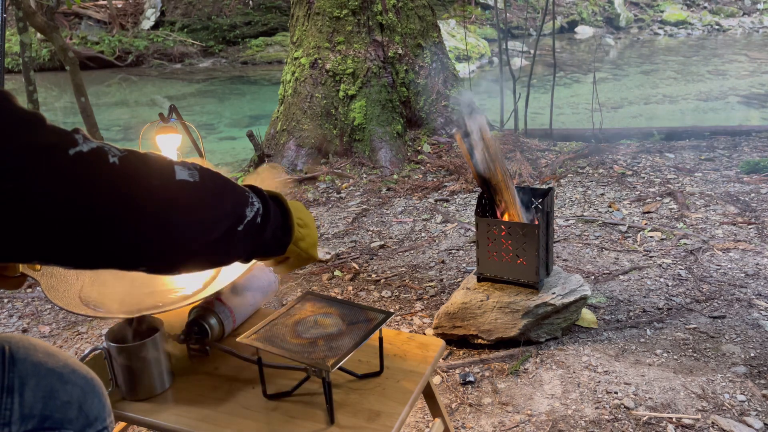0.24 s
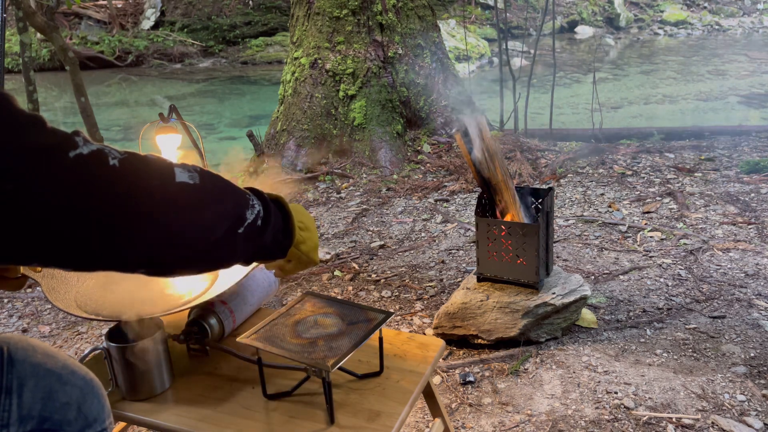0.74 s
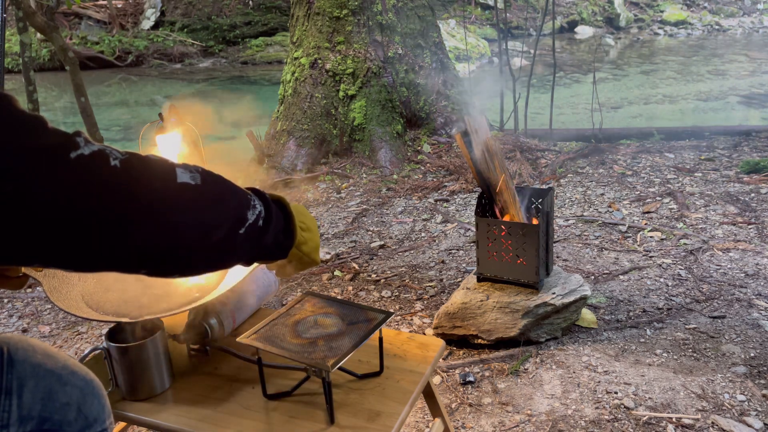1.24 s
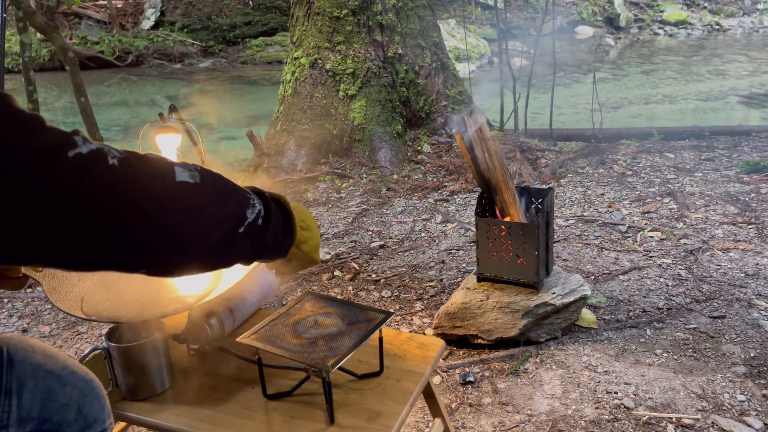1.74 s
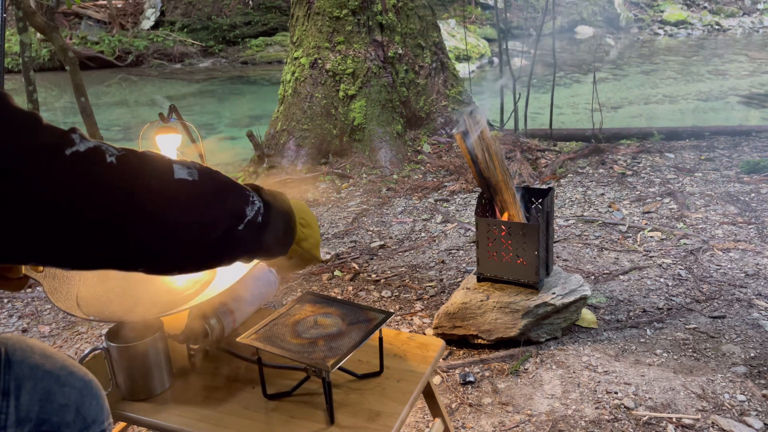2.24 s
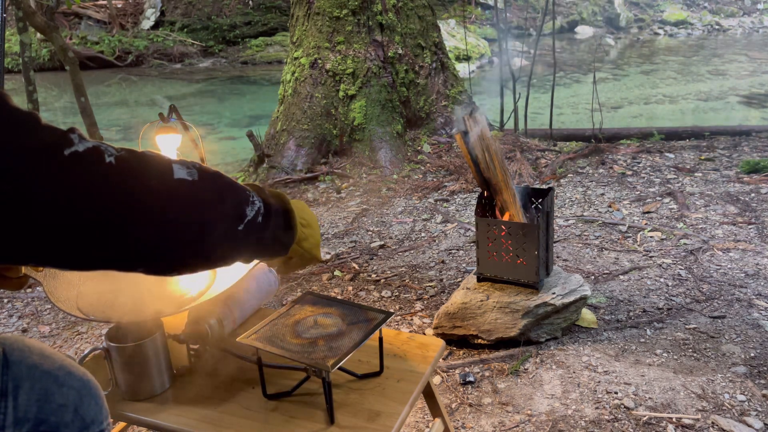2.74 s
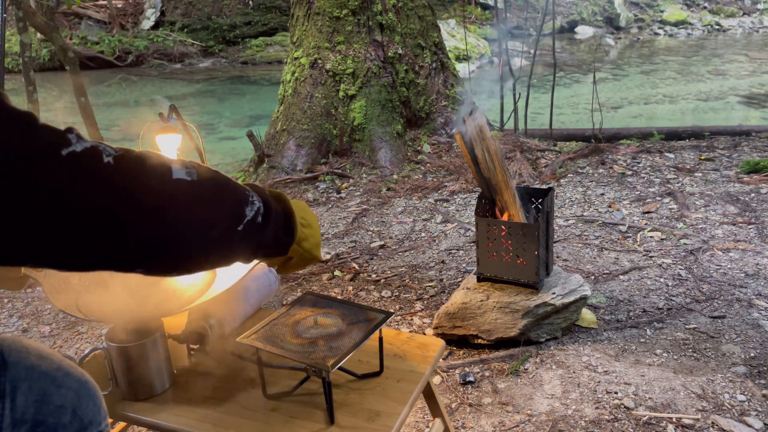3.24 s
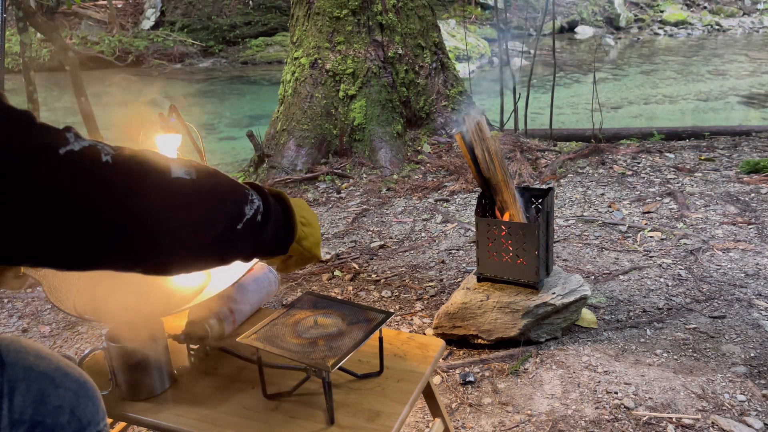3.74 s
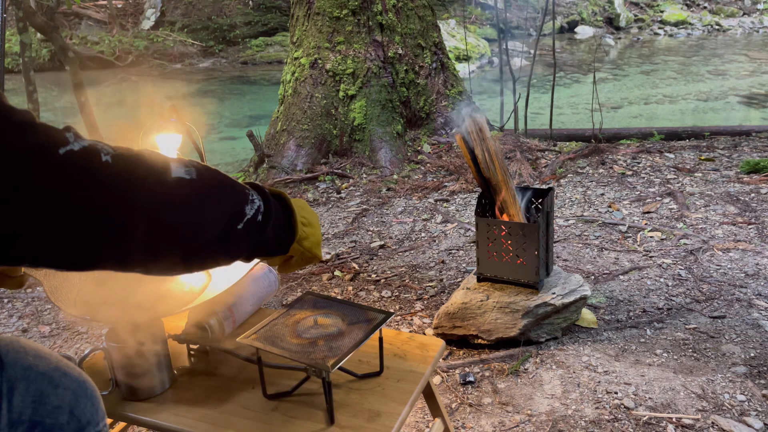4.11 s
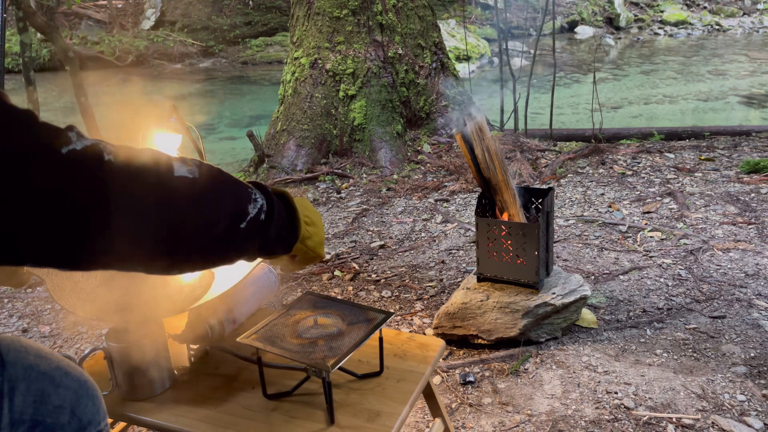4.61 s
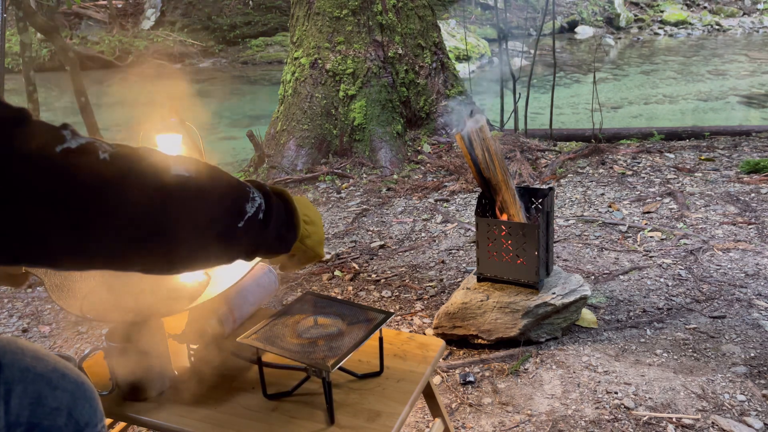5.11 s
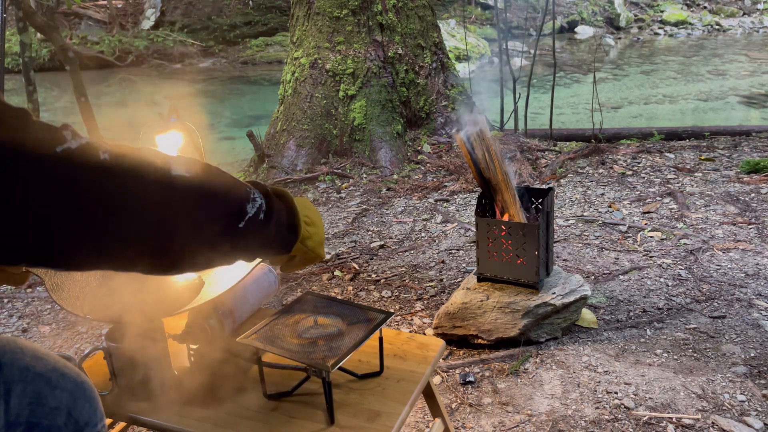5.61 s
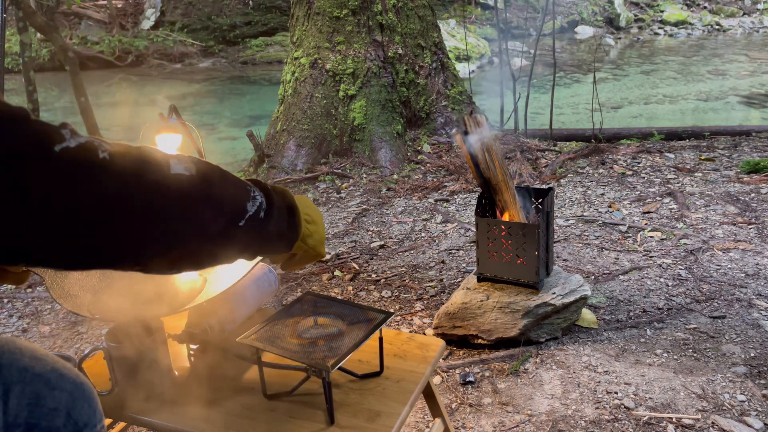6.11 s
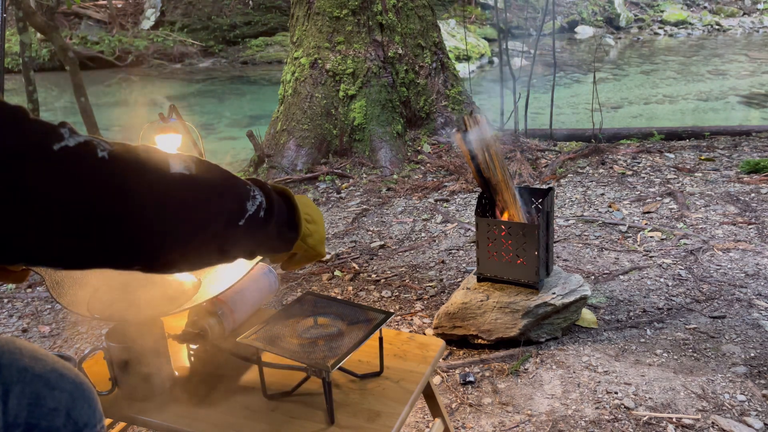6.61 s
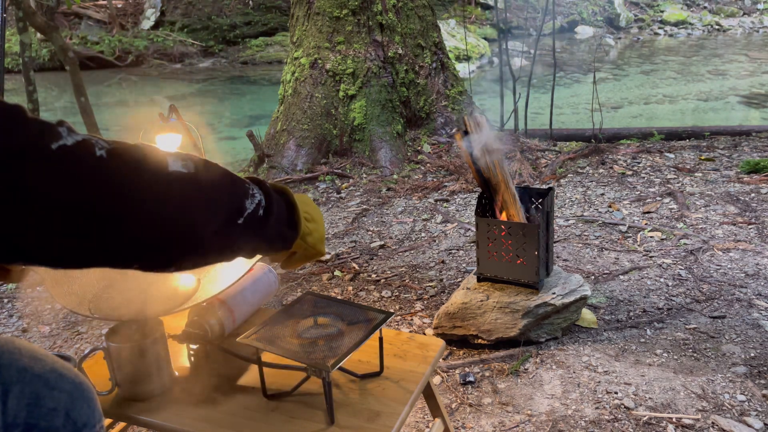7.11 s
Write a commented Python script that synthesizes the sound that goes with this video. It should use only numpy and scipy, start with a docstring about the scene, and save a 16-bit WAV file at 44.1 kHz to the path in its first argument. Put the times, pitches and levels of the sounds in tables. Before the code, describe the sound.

Outdoors by a river, a soft steady rush with a low rumble runs throughout. A wood fire in a small stove snaps very loudly near the start, then pops more softly twice. Hot water trickles into a metal mug, first thinly, then in a strong bubbling gurgle with fine droplet fizz, easing and briefly surging again. Stereo phone pickup, pour slightly to the right.

```python
"""Hot water trickles from a kettle into a steel mug at a riverside camp: noise-like drops ring the mug's
resonances, with gliding decaying sines for bubbles and glugs, noise for splashes, and a climbing hollow note.
A wood fire in a small stove ticks and pops three times, as short flat-spectrum bursts; each pop bounces off
the ground and scatters among the trees. Behind it all the distant river rushes and rumbles, as filtered noise.
A phone picks it up in stereo; its two ports ring in the high treble."""
import sys
import numpy as np
from scipy import signal
from scipy.fft import rfft, irfft, next_fast_len
from scipy.io import wavfile

SR = 44100
rng = np.random.default_rng(int(sys.argv[2]) if len(sys.argv) > 2 else 0)


def persist_wave(psi):
    """Save psi, clipped to +-1, as 16-bit WAV."""
    counts = np.round(np.clip(psi, -1, 1) * 32767).astype(np.int16)
    wavfile.write(sys.argv[1], SR, np.atleast_2d(counts).T)


N = 324135
FFT_SIZE = next_fast_len(N, True)
TIME, FREQ = np.arange(N) / SR, np.fft.rfftfreq(FFT_SIZE, 1 / SR)  # s, Hz
LEFT_RIGHT = np.array([[1], [-1]])

# colour of ticks and of the spatter round the mug: f/Hz, level/dB
SPATTER_COLOUR = [(500, -35), (2000, -21), (3200, -9), (5200, -4), (7200, 2), (8300, 10.5), (9000, 17),
                  (10000, 16.5), (11400, 8), (13000, -66)]
# the mug's hollow note, climbing as it fills: t/s, f/Hz, level/dB before the pour's own gain
HOLLOW_NOTE = [(0, 879, -73), (3.7, 916, -66), (4.9, 1018, -68), (6.3, 1263, -56), (6.55, 1300, -62),
               (6.7, 1295, -58.5), (6.8, 1310, -54), (7.0, 1335, -68)]


def undb(db):
    """Decibels to amplitude gain."""
    return 10 ** (np.asarray(db) / 20)


def unit(x):
    """Scale to an rms of 1."""
    return x / np.sqrt(np.mean(x ** 2))


def curve(points):
    """(Hz, value) points joined on a log-frequency axis."""
    hz, value = np.transpose(points)
    return np.interp(np.log(FREQ + 1), np.log(hz), value)


def shape(x, response):
    """Filter by a frequency response."""
    return irfft(rfft(x, FFT_SIZE) * response, FFT_SIZE)[..., :N]


def causal(db):
    """Minimum-phase response with this spectrum, so it rings only after it is struck."""
    cepstrum = irfft(np.log(undb(db)))
    half = len(cepstrum) // 2
    folded = np.r_[cepstrum[0], 2 * cepstrum[1:half]]
    return np.exp(rfft(folded, len(cepstrum)))


def add(out, s, sound):
    """Mix a short sound in at time s."""
    start = int(np.clip(round(s * SR), 0, N - 1))
    out[..., start:start + sound.shape[-1]] += sound[..., :N - start]


def walk(rate):
    """Random levels, rate per second, joined by straight lines; the spread is near 1."""
    steps = rng.standard_normal(1024)
    return 0.86 * np.interp(TIME * rate, np.arange(len(steps)), steps)


def between_ports(pan_db, phase):
    """Stereo response: left and right share out a level gap in dB and a phase lead in radians."""
    return undb(LEFT_RIGHT * pan_db / 2) * np.exp(1j * LEFT_RIGHT * phase / 2)


def outdoors(x, echo_ms, echo_db, scatter_db, t60):
    """Direct sound, one bounce from the ground, then a short scatter from gear and trunks."""
    t = TIME[:SR // 5]
    scatter = rng.standard_normal((2, len(t))) * undb(-60 * t / t60) * (t > .001)
    response = undb(scatter_db) * unit(scatter) / np.sqrt(len(t))
    response[:, 0] += 1  # direct
    add(response, echo_ms / 1000, undb([echo_db]))
    return signal.fftconvolve(np.atleast_2d(x), response, axes=1)[:, :N]


def ports(x, colour, extra_db=0):
    """Colour a sharp sound; each microphone port rings with its own level and phase."""
    # gap between the ports on sharp sounds: f/Hz, left minus right level/dB, left lead/rad
    port_gaps = np.array([(1000, -4, -.4), (2000, -2.5, -.5), (3000, -3, -1.3), (4500, -8, -.1),
                          (6000, -7, -.5), (7400, -4, -.9), (8000, -.3, -.9), (8800, -.5, .2),
                          (9600, 0, 1.9), (10300, 0, 2.8), (11500, -1, 1.6)])
    pan_db, phase = curve(port_gaps[:, :2]), curve(port_gaps[:, ::2])
    return shape(x, causal(curve(colour) + extra_db) * between_ports(pan_db, phase))


def river(ripple_db=0.97, ripple_rate=11, swell_db=-1.5, low_hz=37):
    """Distant rapids: a rumble and a wide rush whose octaves ripple on their own and swell together."""
    # low rumble, relative: f/Hz, level/dB
    rumble_points = [(12, -72), (20, -37), (38, -16), (56, -12.5), (76, 1), (95, -2.5), (155, -8.5),
                     (179, -11.5), (217, -14), (260, -16.5), (340, -48), (570, -120)]
    # broad rush, relative: f/Hz, level/dB
    rush_points = [(120, -4), (200, -5), (270, 0.5), (390, 4), (490, 0.5), (580, 3.5), (700, -2.5),
                   (1000, -5.5), (1800, -8.5), (2700, -11), (3900, -16.5), (5400, -17), (6500, -18.6),
                   (7500, -20.5), (8900, -15), (9700, -12.5), (10200, -23.5)]
    # the river at the two ports: f/Hz, left minus right level/dB, left lead/rad, likeness/0-1
    river_ports = [(60, 0, 0, 1), (120, -3.5, .2, .97), (180, -2.5, .4, .82), (260, -2.5, .5, .55),
                   (350, -2.5, 1, .66), (450, -1.5, 1.9, .5), (570, -.5, 1.7, .46), (740, -1.5, 2.2, .25),
                   (1000, -2.5, .9, .29), (1430, -3, .7, .2), (2000, -3.5, 0, .54), (2900, -3.5, -.7, .68),
                   (5600, -5.5, -.9, .66), (7200, -3, -1, .73), (8500, -1, -.2, .88), (9600, .5, 2, .82)]
    rumble_db, rush_db, rush_top_hz = -50.5, -51, 10200

    rumble = undb(curve(rumble_points)) / np.hypot(1, (low_hz / (FREQ + 1)) ** 4)
    rush = undb(curve(rush_points)) * (FREQ < rush_top_hz) * (FREQ > 2 * low_hz)
    colour = np.hypot(undb(rumble_db) * unit(rumble), undb(rush_db) * unit(rush))

    hz, *columns = np.transpose(river_ports)
    pan_db, phase, likeness = (curve(np.c_[hz, column]) for column in columns)
    likeness = np.clip(likeness, 0, 1)
    mid, side = rng.standard_normal((2, N))
    water = shape(mid, np.sqrt((1 + likeness) / 2))
    water = water + LEFT_RIGHT * shape(side, np.sqrt((1 - likeness) / 2))
    water = shape(water, colour * between_ports(pan_db, phase))

    octave, swell = np.log2(FREQ + 1), swell_db * walk(1.0)
    # overlapping triangular octave bands
    bands = (shape(water, np.maximum(1 - abs(octave - k), 0)) for k in range(4, 15))
    return sum(band * undb(swell + ripple_db * walk(ripple_rate)) for band in bands)


def burst(length_s, size=256, count=12):
    """A brief run of tiny fractures: noise evened out to a flat spectrum and near unit energy."""
    window, run = np.exp(-(TIME[:size] / length_s) ** 4), rng.standard_normal(size)
    for _ in range(count):
        phase = np.angle(rfft(run * window))
        run = irfft(np.exp(1j * phase))
    return run[:size // 2]


def fire(echo_s=.0048, echo_db=-12, scatter_db=-11, t60=0.11, spread=0.49):
    """Each pop is a few milliseconds at most of tearing fibres, a ground bounce and a dense, short scatter."""
    # splitting wood and sizzling sap: t/s, level/dB, split length/s, tilt/dB per octave, extra sizzle/dB
    pops = [(.9281, 14.2, .0017, 0, .5), (2.4661, -8, .0022, -3.5, 9.5), (6.4491, -3.3, .0025, -4.3, 4)]
    # colour of a snap, with the stove's resonances: f/Hz, level/dB
    snap_colour = [(100, -30), (500, -17), (780, -13), (1200, -23), (1750, -14.5), (2150, -13.5),
                   (2450, -22), (2950, -4), (3500, -11.5), (3900, -18.5), (4400, -5), (5150, -1),
                   (5700, -11), (6300, -9), (6750, 1.5), (7300, 0), (7700, -6), (8100, 3), (8500, 2),
                   (9000, 9), (9450, 0), (10300, 2.5), (11300, -19), (13000, -21), (16000, -20)]
    # colour of its scatter from gear and trunks: f/Hz, level/dB
    scatter_colour = [(200, -22), (700, -10), (1300, -14), (2300, -13), (2900, -6), (3800, -11), (5000, -5),
                      (6500, -1.5), (8200, -1), (9300, 5), (10200, 5), (11200, -8), (12300, -17),
                      (13500, -45)]
    sizzle_hz, sizzle_width_hz = 8900, 1000

    out, t = np.zeros((2, N)), TIME[:SR // 5]
    sizzle = np.exp(-((FREQ - sizzle_hz) / sizzle_width_hz) ** 2)
    for s, db, length_s, tilt_db, sizzle_db in pops:
        split, scatter = np.zeros(N), np.zeros((2, N))
        crack = undb(db) * burst(length_s)
        add(split, s, crack)
        add(split, s + echo_s, undb(echo_db) * crack)
        # noise shared by both ports, plus some of each port's own
        tail = rng.standard_normal(len(t)) + spread * rng.standard_normal((2, len(t)))
        tail = tail * undb(-60 * t / t60)
        add(scatter, s + length_s, undb(db + scatter_db) * tail / np.sqrt(np.sum(tail ** 2) / 2))
        own_db = tilt_db * np.log2(np.maximum(FREQ, 700) / 5000) + sizzle_db * sizzle
        out += ports(split, snap_colour, own_db) + ports(scatter, scatter_colour, own_db)
    return out


def bubble(hz, cycles, rise, glide):
    """A trapped air pocket swells, rings for some cycles and slides in pitch."""
    t = TIME[:SR // 12]
    age = t * hz / cycles
    ring = (1 - np.exp(-t * hz / rise)) ** 2 * np.exp(-age)
    pitch = hz * (1 + glide * np.tanh(age / 2))
    return ring / ring.max() * np.sin(2 * np.pi * np.cumsum(pitch) / SR)


def ticks(tick_db=16.0, length_s=0.0011, shard_db=-9, shard_s=0.004, shard_hz=8300, octaves=0.31, count=3):
    """Each tick is a tiny run of fractures or droplets; shards of their own pitch land just after it."""
    # sharpest ticks of embers and flying drops: t/s, relative level/dB
    tick_hits = [(0.133, -51), (1.6417, -54), (1.6865, -57), (1.8113, -55), (1.8813, -49), (2.075, -48),
                 (2.092, -48), (2.929, -56), (3.262, -57), (3.274, -52.5), (3.4101, -42), (3.7016, -53),
                 (3.9311, -52), (4.1103, -47), (4.1543, -50.5), (4.186, -49), (4.2673, -53), (4.3038, -49),
                 (4.4268, -53), (4.4489, -50), (4.4677, -49), (4.5428, -50), (4.6092, -47), (4.6774, -53.5),
                 (4.833, -48.5), (4.863, -51.5), (4.9847, -52.5), (5.153, -55), (5.1806, -47), (5.262, -53),
                 (6.353, -40.5)]
    out = np.zeros(N)
    for s, db in tick_hits:
        add(out, s, undb(db + tick_db) * burst(length_s))
        for late, detune in rng.random((count, 2)):
            shard = bubble(shard_hz * 2 ** (octaves * (2 * detune - 1)), cycles=3, rise=1, glide=0)
            add(out, s + shard_s * late, undb(db + shard_db) * shard)
    return outdoors(ports(out, SPATTER_COLOUR), echo_ms=4.8, echo_db=-13, scatter_db=-10, t60=.06)


def flow():
    """Strength of the pour as a gain."""
    # strength of the pour: t/s, level/dB
    pour = [(0, -45.5), (1.3, -13.5), (2.1, -5), (2.45, -19.5), (3.6, -9), (4.2, -1), (4.85, -2.5),
            (5.6, -12.5), (6.3, -11), (6.7, -4), (7.05, -20.5)]
    return undb(np.interp(TIME, *np.transpose(pour)))


def note_hz(s):
    """Pitch of the mug's hollow note at time s."""
    times, hz, _ = np.transpose(HOLLOW_NOTE)
    return np.interp(s, times, hz)


def mug_note(width_hz=70, pan_db=-2, growth=1.04):
    """The falling stream keeps one narrow mug resonance ringing unevenly, louder with the flow."""
    narrow = 1 / (1 + (2 * FREQ / width_hz) ** 2)
    drive = [unit(shape(noise, narrow)) for noise in rng.standard_normal((2, N))]
    phase = 2 * np.pi * np.cumsum(note_hz(TIME)) / SR
    ring = drive[0] * np.cos(phase) + drive[1] * np.sin(phase)
    times, _, db = np.transpose(HOLLOW_NOTE)
    return ring * flow() ** growth * undb(np.interp(TIME, times, db) + LEFT_RIGHT * pan_db / 2)


def scattered(bunching, count):
    """Chance events that crowd where the pour is strong: rows (s, size, detune), the last two in spreads."""
    poured = np.cumsum(flow() ** bunching)
    place, size, detune = rng.random((count, 3)).T
    s = np.interp((np.arange(count) + place) / count, poured / poured[-1], TIME)
    return np.c_[s, np.sqrt(12) * (size - .5), np.sqrt(12) * (detune - .5)]


def fizz(drop_db=-55, spread_db=2.0, centre_hz=6200, octaves=0.77, pan_db=-6.0, cluster_s=0.016, count=6):
    """A strong pour flings dense clusters of droplets, each too brief to have a pitch: a soft fizz."""
    out = np.zeros((2, N))
    for s, size, _ in scattered(bunching=2.6, count=60):
        for late, detune, weak in rng.random((count, 3)):
            tap = bubble(centre_hz * 2 ** (octaves * (2 * detune - 1)), cycles=1.5, rise=.6, glide=.04)
            tap_db = drop_db + spread_db * (size - weak) + LEFT_RIGHT * pan_db / 2
            add(out, s + cluster_s * late, undb(tap_db) * tap)
    out = shape(out, 1 / (1 + (FREQ / 11000) ** 24))  # steep cut above 11 kHz
    return outdoors(out, echo_ms=4.8, echo_db=-11, scatter_db=-4, t60=.07)


def bubble_births(faint_db=-52, spread_db=2, detune_share=0.048, cycles=5):
    """Large bubbles, and faint ones that come by chance near the mug's note: rows (s, dB, Hz, cycles)."""
    # large bubbles in the mug: t/s, relative level/dB, starting f/Hz, ring time/cycles
    large = [(.544, -44.5, 903, 4.5), (.556, -46.5, 885, 5), (1.750, -45, 920, 3.8), (1.761, -47, 890, 4.2),
             (3.923, -38.5, 990, 5.5), (4.145, -47, 1030, 5), (4.255, -40.5, 1040, 4),
             (4.284, -41.5, 1050, 4.2), (4.312, -40, 1030, 4.6), (4.344, -50, 950, 4),
             (4.451, -44, 1014, 9.2), (4.488, -42, 1270, 4), (4.491, -46, 920, 3.5), (4.563, -46, 980, 4),
             (4.641, -46.5, 1150, 3.7), (4.656, -45, 990, 3), (4.678, -52, 1060, 6.5),
             (4.767, -49, 1100, 4), (4.823, -40, 1050, 4), (4.849, -44, 1200, 3), (4.865, -39.5, 1060, 4),
             (4.889, -41, 1050, 4.3), (4.895, -49, 1020, 4.4), (5.227, -42.5, 1184, 5),
             (5.539, -45, 1030, 3), (6.322, -39, 932, 6), (6.326, -48, 1320, 4), (6.555, -54, 1330, 4),
             (6.592, -56, 1310, 4), (6.667, -45, 1320, 5), (6.686, -40.5, 1315, 4.4),
             (6.776, -46.5, 1350, 4)]
    faint = [(s, faint_db + spread_db * size, note_hz(s) * (1 + detune_share * detune), cycles)
             for s, size, detune in scattered(bunching=2.4, count=12)]
    return list(large) + faint


def gurgle(bubble_db=-0.9, glug_db=-6, drip_db=-1, skin_db=-8, plunge_db=0.5, splash_s=0.0089,
           plunge_s=0.012, satellite_db=-11, satellite_ratio=1.28):
    """Bubbles, glugs and drips ring as sines; bubbles are born with a small splash, glugs with a long one."""
    # deep glugs where the stream plunges in: t/s, relative level/dB, starting f/Hz
    glugs = [(3.985, -44, 394), (4.16, -46, 387), (4.348, -43.5, 403), (4.428, -39.5, 377),
             (4.488, -45, 350), (4.5, -42.5, 330), (4.564, -52, 420), (4.658, -40, 420), (4.68, -48, 363),
             (4.835, -42, 380), (4.898, -45, 410)]
    # drops that hit the steel wall: t/s, relative level/dB, starting f/Hz
    drips = [(2.028, -44, 3080), (2.037, -44, 3440), (4.088, -43, 3200), (4.305, -43, 3050)]
    # colour of a splash down in the mug: f/Hz, level/dB
    splash_colour = [(150, -16), (320, 7), (520, 12.5), (780, 5.5), (1000, 1), (1300, 5.5), (1700, -5),
                     (3000, -9), (6000, -28), (11000, -70)]

    out, splash, t = np.zeros((2, N)), np.zeros(N), TIME[:SR // 12]
    births = bubble_births()
    for (s, db, hz, cycles), (late, size) in zip(births, rng.random((len(births), 2))):
        gain = undb(db + bubble_db)
        add(out, s, gain * bubble(hz, cycles, rise=1.2, glide=-.06))
        # a smaller, higher bubble pinches off within a few milliseconds
        small = bubble(hz * (satellite_ratio + 0.16 * (size - .5)), cycles=1.7, rise=0.97, glide=0.034)
        add(out, s + 0.0087 * late, gain * undb(satellite_db) * small)
        add(splash, s, undb(db + skin_db) * rng.standard_normal(len(t)) * np.exp(-t / splash_s))
    for s, db, hz in glugs:
        glug = bubble(hz, cycles=4.0, rise=0.31, glide=0.056)
        add(out, s, undb(db + glug_db + LEFT_RIGHT * -1.5) * glug)
        add(splash, s, undb(db + plunge_db) * rng.standard_normal(len(t)) * np.exp(-t / plunge_s))
    for s, db, hz in drips:
        add(out, s, undb(db + drip_db) * bubble(hz, cycles=2.4, rise=0.55, glide=.02))
    out += shape(splash, undb(curve(splash_colour) + LEFT_RIGHT * -1.2))
    return outdoors(out, echo_ms=5, echo_db=-22, scatter_db=-6, t60=.15)


def trickle(body_db=-59, spray_db=-70, drops_per_s=260, spread_db=4.5, pan_db=-3, soft_hz=3500):
    """The stream breaks into drops of uneven size that ring the mug and throw fine spray."""
    # resonances of the air and water in the mug: f/Hz, width/Hz, level/dB
    resonances = [(393, 100, 4), (955, 310, -8), (1270, 260, -8), (1870, 640, -16.5), (3220, 1700, -6.5)]
    sizes = undb(spread_db * np.minimum(rng.exponential(size=(2, N)), 3))
    spray = rng.choice([-1, 1], (2, N)) * sizes
    plunges = spray * (rng.random((2, N)) < drops_per_s / SR)
    mug = sum(undb(db) * 1j * FREQ * width / (hz ** 2 - FREQ ** 2 + 1j * FREQ * width)
              for hz, width, db in resonances)
    # hot water lands softly, so a plunge has little treble
    mug = mug / (1 + (FREQ / soft_hz) ** 4)
    body = unit(shape(plunges, mug)) * undb(body_db + LEFT_RIGHT * pan_db / 2)
    # one fresh drop per sample makes the fine spray
    spray = rng.permuted(spray, axis=1)
    hiss = unit(ports(spray, SPATTER_COLOUR)) * undb(spray_db)
    return outdoors(flow() * (body + hiss), echo_ms=3.7, echo_db=-8, scatter_db=-15, t60=0.12)


def scene():
    """Fire and pouring in front of the river."""
    return fire() + ticks() + fizz() + gurgle() + trickle() + mug_note() + river()


def record(dry):
    """The phone clips whatever passes full scale, then cuts the top above 16 kHz."""
    top_cut = signal.ellip(8, .2, 70, 16000, fs=SR, output="sos")
    return signal.sosfilt(top_cut, np.clip(dry, -1, 1))


dry = scene()
out = record(dry)
persist_wave(out)
```